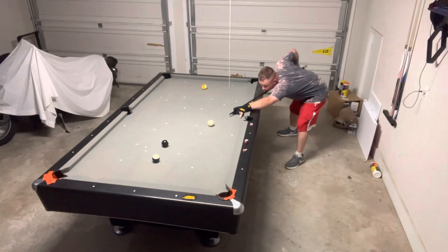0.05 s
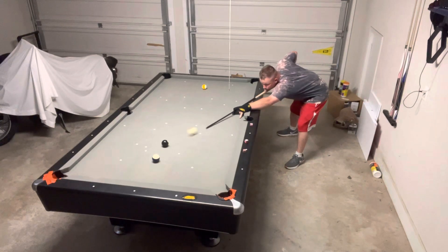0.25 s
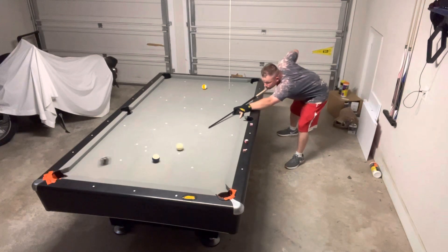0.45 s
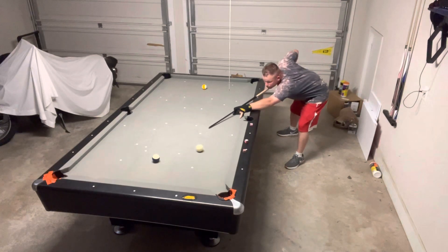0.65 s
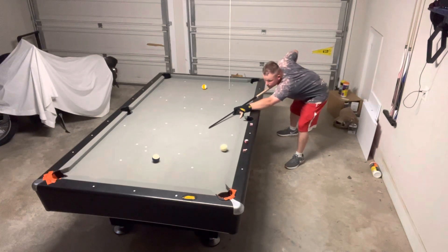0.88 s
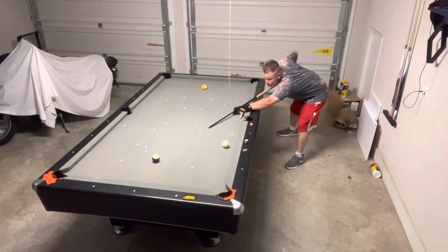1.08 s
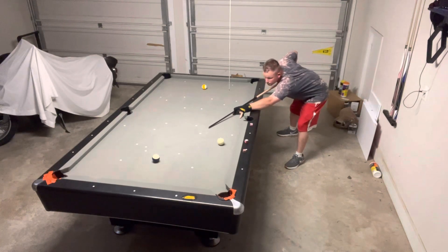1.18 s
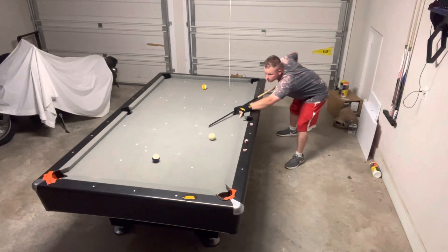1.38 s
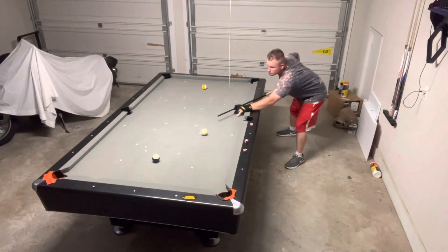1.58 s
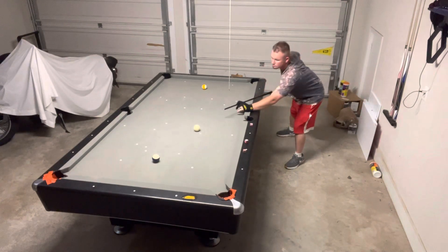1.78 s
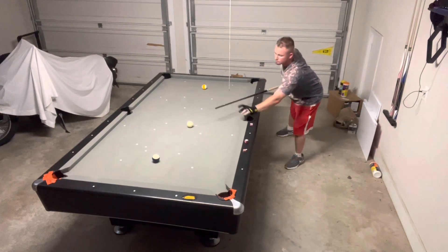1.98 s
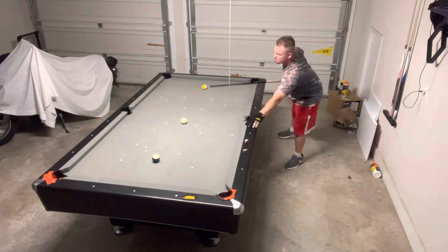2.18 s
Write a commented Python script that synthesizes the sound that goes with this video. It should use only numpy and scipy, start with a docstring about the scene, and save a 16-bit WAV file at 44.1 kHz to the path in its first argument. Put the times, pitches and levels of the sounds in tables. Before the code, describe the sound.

One pool shot, heard from near the table in a reverberant garage. A dry cue knock and a hard ball click lead to a hollow pocket rattle, low rolling and a soft cushion bump, with faint clothing rustle and room hum.

```python
"""A low hum and a fading rumble, then the dry knock of a cue: one pool shot in a bare, ringing garage.
The tip sets the shaft ringing; the cue ball clicks into an object ball and the click slaps off the walls.
That ball rattles into a hollow corner pocket and clacks at the bottom, while the cue ball rumbles on
over the slate and bumps a rubber cushion. Clothes rustle and swish faintly as the player stands up.
Hiss and a faint electrical ticking lie under it all."""
import sys
import numpy as np
from scipy import signal
from scipy.fft import rfft, irfft
from scipy.io import wavfile
from scipy.ndimage import uniform_filter1d, minimum_filter1d

SR = 44100
rng = np.random.default_rng(int(sys.argv[2]) if len(sys.argv) > 2 else 0)


def pcm_store(signal):
    """Save signal as 16-bit PCM."""
    levels = np.round(np.clip(np.atleast_2d(signal), -1, 1) * 32767)
    wavfile.write(sys.argv[1], SR, levels.astype(np.int16).T)


N = 99225
FFT_SIZE = 2 ** 18
HZ = np.maximum(np.arange(FFT_SIZE // 2 + 1) * SR / FFT_SIZE, 1)
T = np.arange(N) / SR

# low hum of the room: freq_hz, gain_db
HUM_EQ = [(20, -19), (45, -13), (68, 2), (100, -6.5), (140, -21), (210, -20.5), (300, -37.5), (700, -38),
          (2000, -65.5)]
# thin hiss above it: freq_hz, gain_db
HISS_EQ = [(200, 10.5), (800, 7), (2500, 1.5), (4500, -1.5), (6200, 5), (8000, -7), (11000, 1),
           (15000, 0.5)]
# one electrical tick: pitch_hz, level_db, t60_s
TICK_RING = [(1670, -85, 0.012), (6020, -90, 0.011)]
# fader ride on the slate's rumble: time_s, level_db
RUMBLE_FADER = [(0, -48.5), (.2, -69), (.24, -39), (.4, -36), (.53, -42.5), (.66, -39.5), (.82, -71),
                (.98, -50.5), (1.25, -47), (1.45, -49.5), (1.7, -59.5), (2.25, -50.5)]
# bass weight of that rumble: freq_hz, gain_db
RUMBLE_EQ = [(25, -19.5), (48, -5.5), (66, 1.5), (90, -6.5), (130, -13.5), (200, -28), (320, -48),
             (4000, -80)]

# cue tip on the ball: start_s, level_db
CUE_STROKES = [(0.2143, -25.5)]
# its dry knock: freq_hz, gain_db
CUE_EQ = [(25, -23), (80, -9), (200, -1.5), (380, -11), (650, 0.5), (950, 0), (1500, -2.5), (1900, -8),
          (3500, -4.5), (4200, -14.5), (4700, -9.5), (6000, -11.5), (7300, -25), (15000, -30)]
# shaft and ferrule ringing under the knock: pitch_hz, gain_db, t60_s
SHAFT_RING = [(476, -21.5, 0.069), (1357, -9, 0.21), (1632, -9.5, .16), (2017, -14, 0.036),
              (2608, -14.5, 0.1), (3330, -17, .1), (6227, -15, .025)]
# the tip's thump, heard straight on: pitch_hz, gain_db, t60_s
TIP_RING = [(946, -9, 0.021), (1361, -12, 0.19), (6100, -17.5, 0.025)]

# ball on ball: start_s, level_db
CLICK_HITS = [(0.3276, -22.5)]
# hard body of the click: freq_hz, gain_db
CLICK_EQ = [(40, -33), (200, -18), (600, -18), (1000, -10.5), (1600, -1), (2300, -0.5), (3000, -7),
            (4000, -18), (5400, -31.5), (6200, -30.5), (7300, -41), (11000, -40.5), (14000, -32.5)]
# thin snap that only travels straight: freq_hz, gain_db
SNAP_EQ = [(2000, -33), (6000, -1.5), (9000, -8.5), (14000, -2)]
# colour of the click's sideways beam: freq_hz, gain_db
BEAM_EQ = [(1800, -3), (3000, 1.5), (4200, -3.5), (5600, -8), (8000, -14.5)]
# the beam slapping back off walls and ceiling: delay_s, gain_db, pan_db, spread_s
WALL_SLAPS = [(.007, -12, -4, .004), (0.0188, -6.5, -7, 0.0013), (0.02, -5, -8.5, .0012),
              (0.025, -11.5, -6.5, .0012), (.0395, -12, -3.5, .001), (.048, -18.5, -2, 0.0012)]
# tones the click leaves hanging in the garage: pitch_hz, gain_db, t60_s
CLICK_RING = [(1599, -18, 0.39), (2107, -14, 0.53), (2295, -14, 0.48), (2526, -15, .4), (3120, -19, 0.21)]

# ball against the pocket's jaws and liner: start_s, level_db, pitch_hz, treble_db, hollow_note_db
POCKET_KNOCKS = [(.566, -46, 878, 22.5, -9), (0.5944, -32.5, 945, 15.5, 2), (0.6229, -35.5, 1007, 1, -0.5),
                 (0.6704, -35.5, 854, 13, 0), (.68, -38, 782, 6.5, -13), (.728, -38.5, 731, -21, -4),
                 (0.790, -43.5, 890, -33, -7), (.893, -47.5, 819, -31, -3)]
# the pocket's thud: freq_hz, gain_db
POCKET_EQ = [(30, -9.5), (65, 10.5), (120, 0.5), (230, 2.5), (380, -7), (720, -1), (1250, -8.5),
             (2000, -8.5), (3500, -27.5), (5500, -20), (8000, -30.5), (15000, -34.5)]
# ball at the bottom of the pocket: start_s, level_db
CLACK_HITS = [(.657, -40), (0.686, -32.5), (.771, -45.5)]
# hard midrange of a clack: freq_hz, gain_db
CLACK_EQ = [(150, -15), (700, -3), (1200, -5), (1650, 3), (2100, -1), (2700, -7.5), (3600, -19),
            (12000, -53)]
# cue ball into the cushion: start_s, level_db
CUSHION_HITS = [(1.018, -52)]
# the rubber's deep bump: freq_hz, gain_db
CUSHION_EQ = [(30, -16), (80, 11.5), (200, -0.5), (400, -25), (1500, -47), (8000, -75)]

# fader ride on the rustle of clothes: time_s, level_db
CLOTH_FADER = [(0, -91.5), (1.55, -94), (1.71, -76), (1.87, -72), (1.95, -76.5), (2.25, -80)]
# airy colour of the cloth: freq_hz, gain_db
CLOTH_EQ = [(200, 0.5), (700, -1.5), (1500, 4.5), (3000, -2), (4200, -4), (5700, 1), (9000, -11),
            (15000, -19.5)]
# swishes of a sleeve: start_s, level_db, rise_s, start_pitch_hz
SLEEVE_SWISHES = [(1.785, -77, 0.029, 5500), (1.973, -66.5, 0.035, 7530)]
# a soft shuffle at the end: start_s, level_db
SHUFFLE_HITS = [(2.172, -66), (2.203, -76), (2.236, -73)]
# its muffled colour: freq_hz, gain_db
SHUFFLE_EQ = [(150, 5), (500, -4.5), (950, 2), (1900, -5), (3000, -16), (10000, -32)]

# reverb time of the garage: freq_hz, t60_s
GARAGE_DECAY = [(60, 0.67), (200, 0.95), (500, 0.61), (1400, 0.58), (2300, 0.51), (9000, 0.43),
                (15000, 0.28)]
# left-right likeness of diffuse sound, 1 being mono: freq_hz, correlation
STEREO_LIKENESS = [(70, 0.98), (150, 1), (280, 0.2), (600, 0.1), (2000, .05), (12000, 0)]
# microphone colour: freq_hz, gain_db
MIC_EQ = [(20, -7), (50, 0.5), (5500, -1), (6250, 1), (7000, -5), (10000, -0.5), (11200, -6.5),
          (11800, -35.5), (12600, -29), (13400, 1), (14500, -1.5)]


def amp(db):
    """Decibels to gain."""
    return 10 ** (np.asarray(db) / 20)


def at_hz(curve, hz=HZ):
    """Read a curve on a log-frequency axis."""
    freqs, values = np.transpose(curve)
    return np.interp(np.log(hz), np.log(freqs), values)


def unit(x):
    """Scale to an average energy of 1 per channel."""
    return x / np.sqrt(np.mean(np.sum(x * x, axis=-1)) + 1e-30)


def panned(db):
    """Stereo gains for a level difference; negative leans right."""
    return amp(np.array([[db], [-db]]) / 2)


def convolve(sound, response):
    """Play a sound through an impulse response."""
    return irfft(rfft(sound, FFT_SIZE) * rfft(response, FFT_SIZE))[..., :N]


def delayed(x, delay_s):
    """The same sound, later."""
    lag = int(np.clip(delay_s * SR, 0, N - 1))
    return np.concatenate([np.zeros(lag), x[:N - lag]])


def pulse(eq):
    """The tightest transient with this EQ: a minimum-phase pulse."""
    cepstrum = irfft(np.log(amp(at_hz(eq))))
    cepstrum[1:FFT_SIZE // 2] *= 2
    cepstrum[FFT_SIZE // 2 + 1:] = 0
    return irfft(np.exp(rfft(cepstrum)))[:N]


def ring(hz, t60_s):
    """One dying mode of energy 1."""
    return unit(np.sin(2 * np.pi * hz * T) * amp(-60 * np.minimum(T / t60_s, 5)))


def struck(modes):
    """All modes of one body ringing together."""
    return sum(amp(db) * ring(hz, t60_s) for hz, db, t60_s in modes)


def trigger(sound, hits):
    """Fire a sound at each hit; for energy 1, the level is its rms over a tenth of a second."""
    return sum(amp(db) * delayed(sound, start_s) for start_s, db in hits) * np.sqrt(SR / 10)


def diffuse():
    """Spectrum of stereo white noise, centred in the bass and wide in the treble."""
    mid, side = rfft(rng.standard_normal((2, FFT_SIZE)))
    alike = np.clip(at_hz(STEREO_LIKENESS), 0, 1)
    return np.sqrt(1 + alike) * mid + np.sqrt(1 - alike) * side * [[1], [-1]]


def noise(eq):
    """A bed of coloured diffuse noise, rms 1."""
    return unit(irfft(diffuse() * amp(at_hz(eq)))[:, :N]) * np.sqrt(N)


def scattered(x, decay_s):
    """Nearby surfaces smear a contact over a few milliseconds without colouring it."""
    t = np.arange(2 ** 11) / SR
    window = np.exp(-t / decay_s) * (1 - np.exp(-2 * t / decay_s))
    burst = irfft(diffuse())[:, :len(t)]
    for _ in range(3):  # make the burst both short and spectrally flat
        spectrum = rfft(burst * window)
        burst = irfft(spectrum / (np.abs(spectrum) + 1e-12))
    return signal.fftconvolve(np.atleast_2d(x), unit(burst * np.sqrt(window)), axes=1)[:, :N]


def garage(predelay_s=0.0014, build_up_s=0.008):
    """Reverb tail from one spot: it blooms, then each octave dies at its own rate."""
    field, tail = diffuse(), 0
    octaves_hz = 62.5 * 2.0 ** np.arange(9)
    for hz, share in zip(octaves_hz, np.eye(len(octaves_hz))):
        band = irfft(field * np.interp(np.log(HZ), np.log(octaves_hz), share))[:, :N]
        tail = tail + band * amp(-60 * T / at_hz(GARAGE_DECAY, hz))
    bloom = 1 - np.exp(-np.maximum(T - predelay_s, 0) / build_up_s)
    return unit(tail * bloom)


def in_garage(dry, direct_db, scatter_s):
    """The near path off slate and rails, plus the garage's tail."""
    return amp(direct_db) * scattered(dry, scatter_s) + convolve(dry, garage())


def room_tone(hum_db=-53, hiss_db=-76, ticks_per_s=30):
    """A steady bed of low hum, hiss and faint electrical ticking."""
    tick = struck(TICK_RING) * np.sqrt(SR / ticks_per_s)
    ticks = sum(delayed(tick, start_s) for start_s in np.arange(0.01, N / SR, 1 / ticks_per_s))
    return amp(hum_db) * noise(HUM_EQ) + amp(hiss_db) * noise(HISS_EQ) + ticks


def slate_rumble():
    """Bass noise that swells and sinks: the slate under rolling balls."""
    level_db = np.interp(T, *np.transpose(RUMBLE_FADER))
    return amp(level_db) * noise(RUMBLE_EQ)


def cue_knock():
    """A leather-tipped knock that sets the shaft ringing."""
    knock = unit(unit(pulse(CUE_EQ)) + struck(SHAFT_RING))
    stroke = in_garage(trigger(knock, CUE_STROKES), direct_db=-12.5, scatter_s=0.004)
    tip_thump = trigger(struck(TIP_RING), CUE_STROKES)
    return panned(-1.5) * (stroke + tip_thump)


def ball_click(direct_db=-8.5, snap_db=-44, wall_delay_s=0.0095):
    """A very short, hard contact that beams sideways, louder off the walls than straight on."""
    click = trigger(unit(pulse(CLICK_EQ)), CLICK_HITS)
    beam = convolve(click, pulse(BEAM_EQ))
    slaps = sum(amp(db) * panned(pan_db) * scattered(delayed(beam, delay_s), spread_s)
                for delay_s, db, pan_db, spread_s in WALL_SLAPS)
    snap_hits = [(start_s, snap_db) for start_s, _ in CLICK_HITS]
    snap = scattered(trigger(unit(pulse(SNAP_EQ)), snap_hits), decay_s=0.006)
    near = amp(direct_db) * scattered(click, decay_s=0.003)
    # the garage answers only once the beam has met a wall
    tones = delayed(trigger(struck(CLICK_RING), CLICK_HITS), wall_delay_s)
    tail = convolve(delayed(click, wall_delay_s), garage())
    return panned(-3.5) * (near + tones + tail) + slaps + snap


def pocket_rattle(crossover_hz=2000, ring_db=2):
    """The ball knocks about in the jaws and hollow liner, duller as it settles."""
    thud = unit(pulse(POCKET_EQ))
    body = signal.sosfilt(signal.butter(1, crossover_hz, fs=SR, output="sos"), thud)
    treble = thud - body
    knocks, hollow_notes = 0, 0
    for start_s, db, hz, treble_db, note_db in POCKET_KNOCKS:
        knock = body + amp(treble_db) * treble + amp(ring_db) * ring(hz, t60_s=0.017)
        knocks += trigger(unit(knock), [(start_s, db)])
        hollow_notes += trigger(ring(hz, t60_s=0.067), [(start_s, db + note_db)])
    rattle = in_garage(knocks, direct_db=-2, scatter_s=0.0069)
    # the hollow note comes straight from the pocket's mouth, with no reverb
    return rattle + scattered(hollow_notes, decay_s=0.00136)


def pocket_clacks():
    """The ball lands hard at the bottom of the pocket."""
    clacks = trigger(unit(pulse(CLACK_EQ)), CLACK_HITS)
    return in_garage(clacks, direct_db=1, scatter_s=0.0049)


def cushion_bump():
    """Rubber gives under the cue ball: a soft, deep bump."""
    bump = trigger(unit(pulse(CUSHION_EQ)), CUSHION_HITS)
    return in_garage(bump, direct_db=2, scatter_s=0.0032)


def clothes_rustle(crinkle_db=2, grain_s=0.0083):
    """Cloth catches and slips, giving the rustle its grain."""
    crinkle = np.interp(T / grain_s, np.arange(N), rng.standard_normal(N))
    level_db = np.interp(T, *np.transpose(CLOTH_FADER))
    return amp(level_db + crinkle_db * crinkle) * noise(CLOTH_EQ)


def sleeve_swish(start_s, db, rise_s, start_hz, fall_oct_per_s=9.8, half_width_hz=2800):
    """Cloth slides on cloth: a band of noise swells, then dulls and fades as the arm slows."""
    age_s = np.maximum(T - start_s, 0)
    lowpass = signal.butter(2, half_width_hz, fs=SR, output="sos")
    band = signal.sosfilt(lowpass, rng.standard_normal((2, N)))
    centre_hz = start_hz * 2 ** (-fall_oct_per_s * age_s)
    hiss = unit(band * np.cos(2 * np.pi * np.cumsum(centre_hz) / SR)) * np.sqrt(N)
    swell = age_s / rise_s * np.exp(1 - age_s / rise_s)
    return amp(db) * swell * hiss


def player_stands():
    """Dry rustle and sleeve swishes, then a soft shuffle heard only as reverb."""
    rustle = clothes_rustle()
    shuffle = scattered(trigger(unit(pulse(SHUFFLE_EQ)), SHUFFLE_HITS), decay_s=0.00695)
    swishes = sum(sleeve_swish(*row) for row in SLEEVE_SWISHES)
    return rustle + swishes + convolve(shuffle, garage())


def scene():
    """The whole shot over the room tone, with the pocket a touch to the right."""
    shot = cue_knock() + ball_click()
    pocket = panned(-1.5) * (pocket_rattle() + pocket_clacks())
    return shot + pocket + slate_rumble() + cushion_bump() + player_stands() + room_tone()


def limiter(x, ceiling=0.92):
    """Duck both channels smoothly around any peak over the ceiling."""
    gain = np.minimum(1, ceiling / (np.abs(x).max(axis=0) + 1e-9))
    return x * uniform_filter1d(minimum_filter1d(gain, size=101), size=101)


def record(dry, fade_in_s=0.008, cutoff_hz=15800):
    """A quick fade-in, microphone colour, a peak limiter, then a steep top cut."""
    coloured = convolve(dry * np.minimum(T / fade_in_s, 1), pulse(MIC_EQ))
    top_cut = signal.firwin(401, cutoff_hz, fs=SR, window="blackman")
    return signal.fftconvolve(limiter(coloured), top_cut[None], "same", axes=1)


dry = scene()
out = record(dry)
pcm_store(out)
```